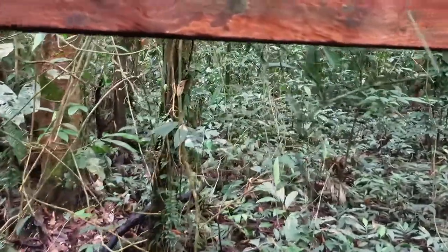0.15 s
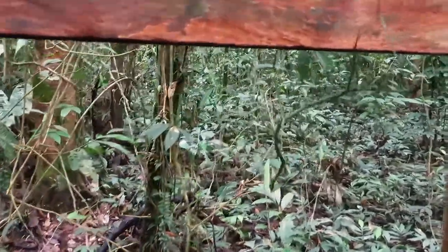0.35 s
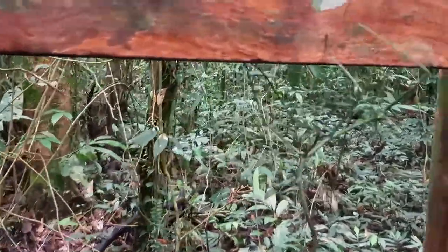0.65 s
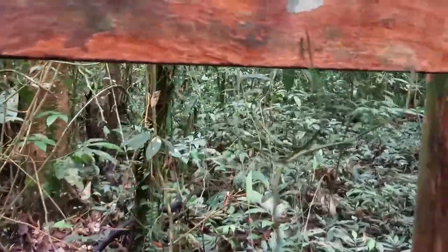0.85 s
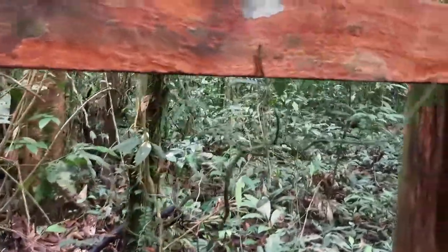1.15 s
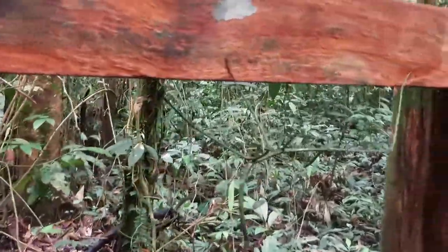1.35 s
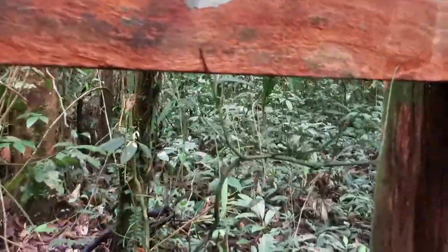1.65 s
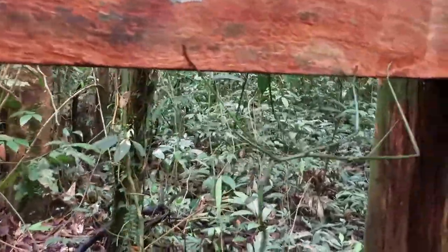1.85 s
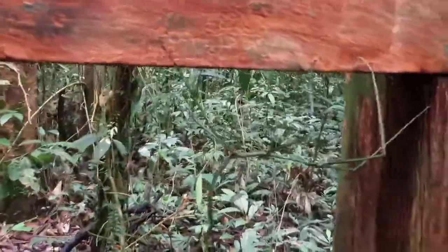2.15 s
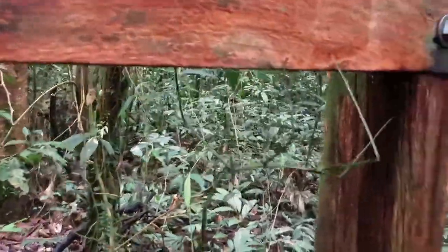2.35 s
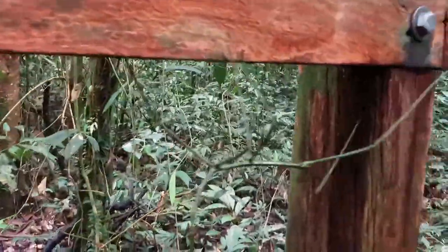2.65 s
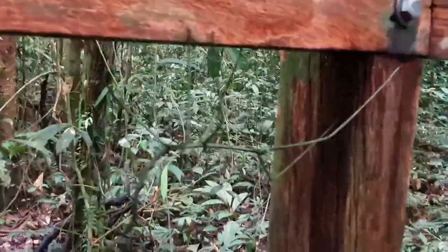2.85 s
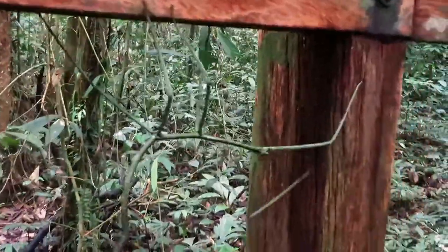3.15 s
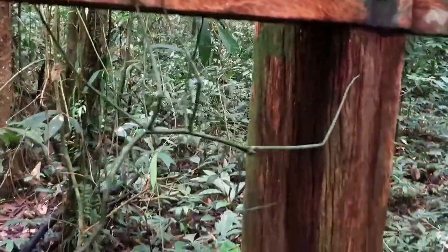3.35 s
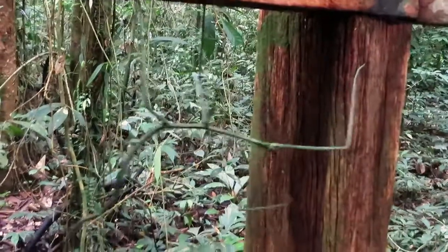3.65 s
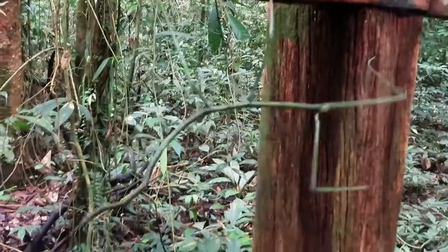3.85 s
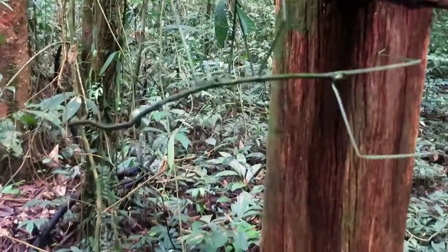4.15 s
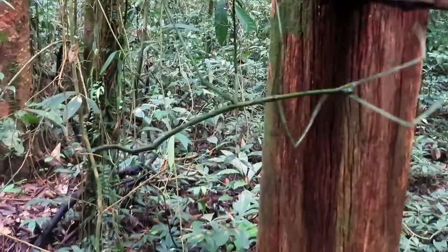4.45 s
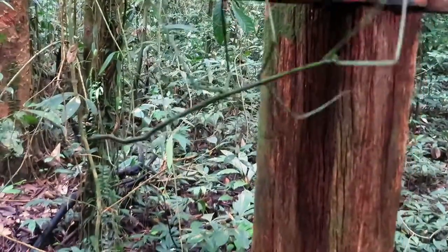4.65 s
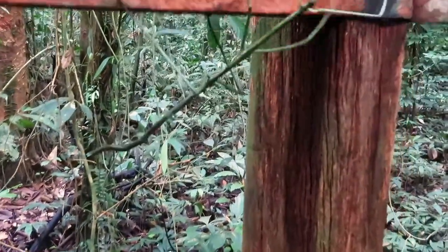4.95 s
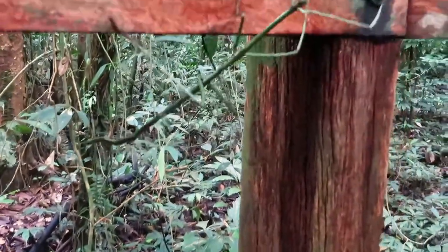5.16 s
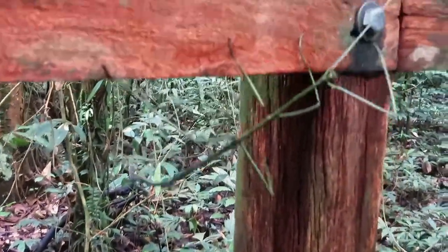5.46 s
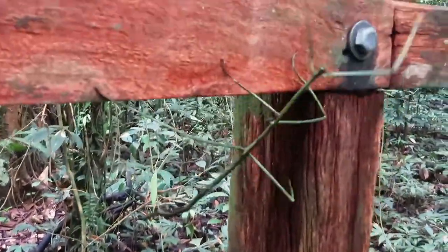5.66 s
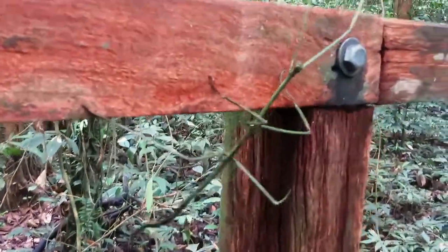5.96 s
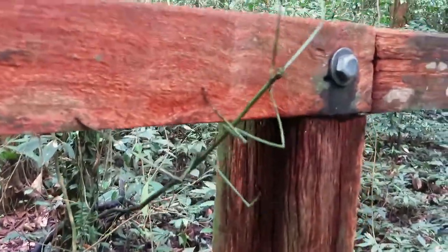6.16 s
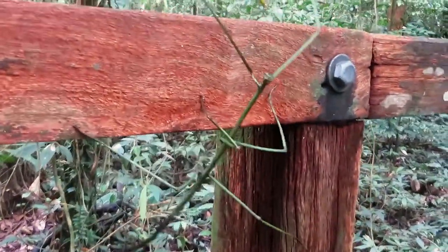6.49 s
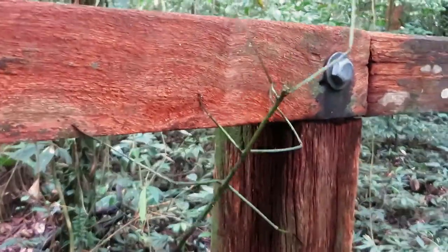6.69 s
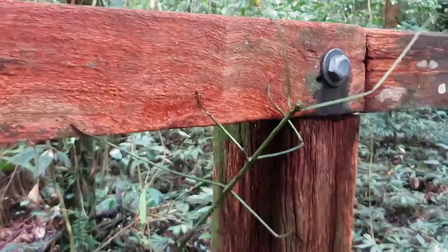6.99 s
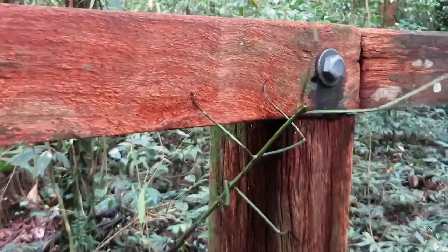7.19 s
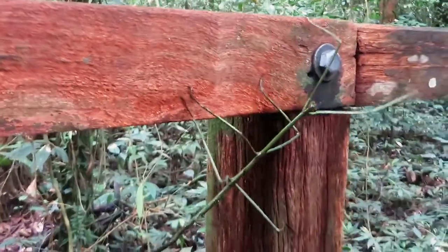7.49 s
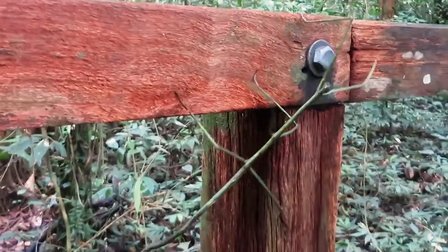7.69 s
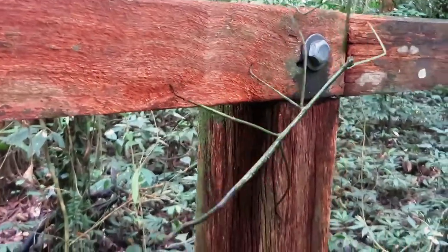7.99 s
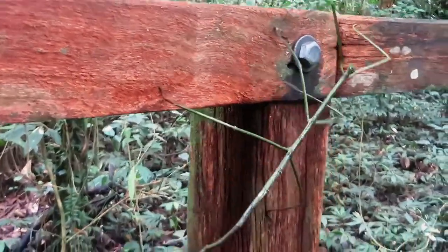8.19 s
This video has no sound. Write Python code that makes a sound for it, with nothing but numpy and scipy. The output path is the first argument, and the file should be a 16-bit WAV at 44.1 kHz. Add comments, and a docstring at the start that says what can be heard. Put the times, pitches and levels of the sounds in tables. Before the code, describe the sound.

A thick insect drone at a whistling mid-high pitch fills a rainforest from start to finish, swelling into a nasal whine. Above it a nearby cricket trills about once a second, with distant ones answering, over cicada hiss and a very high buzz. Faint low hoots come from afar; late on, a bird gives one quick falling call and two dry snaps click near a handheld microphone.

```python
"""A dense insect chorus drones near 2 kHz in a rainforest, with whining singers standing out of it.
A cricket trills about once a second, its far neighbours answer, and katydids hiss and buzz above.
Rising whoops, a bird's falling call and low hoots echo among the trunks; handling ticks, snaps and bumps.
Crowds are filtered noise and single callers are sines with moving pitch and level;
trunk echoes are convolution with decaying noise, and contacts are brief bursts of coloured noise."""
import sys
import numpy as np
from scipy import signal
from scipy.fft import rfft, irfft, next_fast_len
from scipy.io import wavfile
from scipy.ndimage import map_coordinates

SR = 44100
rng = np.random.default_rng(int(sys.argv[2]) if len(sys.argv) > 2 else 0)


def int16_out(signal):
    """Quantize to a 16-bit WAV file."""
    q = np.round(np.clip(np.atleast_2d(signal).T, -1, 1) * 32767)
    wavfile.write(sys.argv[1], SR, q.astype(np.int16))


N = 367353
T = np.arange(N) / SR  # time of each sample, s

# All levels below are relative, in dB; the functions add their own trims.
# Spectra. Each row: frequency in Hz, spectral level in dB per Hz.
AIR_SPECTRUM = [(20, -22), (60, 1), (130, 1.5), (300, -2.5), (650, -6), (860, -4), (1200, -6.5),
                (3000, -27.5), (7000, -31), (9000, -55.5), (13000, -32)]
CHORUS_SPECTRUM = [(900, -48), (1300, -26), (1480, -6.5), (1650, 0.5), (1850, 1), (2000, 0), (2200, -1),
                   (2320, -3), (2520, -19.5), (2800, -62.5)]
CICADA_SPECTRUM = [(2000, -15), (2500, 3), (2680, 0.5), (2800, 0), (3000, 5), (3600, 3), (4200, -1),
                   (4600, -4), (5600, -5.5), (6800, -12.5), (8000, -50)]
CRICKET_SPECTRUM = [(5300, -37), (5750, -16.5), (6000, 2), (6200, 7), (6450, 9.5), (6620, 3.5),
                    (6750, -50.5), (7100, -63)]
KATYDID_SPECTRUM = [(7000, -21.5), (7500, -20.5), (7750, -13), (7900, -9.5), (8230, -3), (8450, -7.5),
                    (8700, -12.5), (8900, -23), (9300, -72.5)]
TICK_SPECTRUM = [(300, -10), (2000, -1), (5000, -5), (8000, -5.5), (12000, -13.5)]
SNAP_SPECTRUM = [(300, -21), (1500, -14), (2900, -1.5), (3500, -11), (4200, -7.5), (5400, 4), (6000, -13),
                 (8000, -19), (12000, -32)]
BUMP_SPECTRUM = [(30, -22), (150, -4), (270, 1.5), (500, -11), (1000, -1.5), (2500, -20.5), (6000, -28),
                 (10000, -52.5)]
# Width of the air. Each row: frequency in Hz, side-to-mid ratio in dB.
AIR_SIDE = [(25, -6.5), (60, -12), (125, 4), (250, 8.5), (500, 9), (1000, 1), (3000, -8.5), (9000, 0)]
# Reverberation of the trees. Each row: frequency in Hz, time to fall by 60 dB in s.
FOREST_T60 = [(300, 0.54), (2000, 0.73), (4000, 0.92), (10000, 0.28)]

# Contacts: faint handling ticks, dry snaps close by, soft handling bumps.
# Each row: start in seconds, level at the onset in dB.
TICKS = [(2.9944, -17.5), (3.889, -22), (6.725, -24), (6.8204, -14.5), (7.231, -20)]
SNAPS = [(6.6646, -15.5), (6.6918, -18.5)]
BUMPS = [(1.43, -34.5), (2.289, -39), (2.892, -34), (3.052, -36.5), (5.099, -36.5), (6.049, -32),
         (6.654, -37), (7.228, -31.5), (7.569, -39)]

# The bird's faint opening note and its loud falling slur.
# Each row: time in seconds, pitch in Hz, level in dB.
BIRD = [(5.74, 3900, -62), (5.82, 3950, -46), (5.95, 3950, -46), (6.01, 3900, -52), (6.06, 4150, -37),
        (6.115, 4180, -35), (6.135, 3700, -33), (6.18, 3280, -31), (6.24, 3050, -48)]
# Bouts of far low hooting. Each row: start in seconds, end in seconds, level of the first hoot in dB.
HOOT_BOUTS = [(.5, .9, -50), (1.95, 2.5, -51), (2.9, 3.4, -52), (4.25, 5.0, -53), (5.3, 5.9, -53.5),
              (6.25, 6.45, -55.5)]
HOOT_HZ, HOOT_SCATTER_HZ = 842, 14  # mean pitch and its standard deviation
HOOT_S, HOOT_GAP_S = .06, .095  # length, and spacing from start to start
HOOT_FADE_DB_PER_S = 7.5

# The highest insects, each drifting slowly up and down.
# Each row: mean pitch in Hz, level in dB, drift period in s, time of a highest pitch in s.
HIGH_SINGERS = [(11637, -3, 4.05, .62), (11509, -5, 4.75, 1.15), (11918, -6, 3.2, .65)]
# Level of the highest insects. Each row: time in seconds, level in dB.
HIGH_LEVEL = [(0.03, -52.5), (0.33, -47.5), (0.56, -53.5), (0.88, -47.5), (1.09, -52.5), (1.27, -46),
              (1.73, -51), (1.96, -45.5), (2.03, -53), (2.36, -44.5), (2.58, -52.5), (2.77, -45.5),
              (2.88, -50.5), (3.67, -50), (4.15, -55), (4.27, -47.5), (4.7, -49.5), (4.87, -45),
              (5.14, -51.5), (6.96, -47.5), (7.08, -54), (7.38, -46), (7.59, -52), (7.65, -48),
              (8.05, -54.5), (8.3, -50)]
HIGH_DRIFT_HZ = 23
HIGH_STROKES_PER_S, HIGH_STROKE_DEPTH = 290, .4

# Thin steady singers. Each row: pitch in Hz, half-width in Hz, level in dB.
STEADY_SINGERS = [(2989, 18, -56), (2711, 17, -54), (4066, 16, -62), (5183, 22, -52.5), (7320, 40, -63.5)]
# Waves of far crickets answering. Each row: start in seconds, end in seconds, level in dB.
ANSWERS = [(-.1, 0.348, -40.5), (.5, 1.103, -42.5), (1.355, 2.004, -41.5), (2.45, 2.954, -41),
           (3.448, 4.3, -42), (4.54, 5.15, -41), (5.2, 5.7, -45), (6.15, 6.747, -44), (7.216, 7.718, -40),
           (8.182, 8.6, -43)]
ANSWER_RISE_S, ANSWER_FALL_S, CRICKET_BED_DB = .16, .23, -44
CICADA_DB, KATYDID_DB, KATYDID_FADE_DB_PER_S = -43, -43, .09

# The near cricket's trills. Each row: start in seconds, length in s, level in dB, pulse depth from 0 to 1.
TRILLS = [(0.177, 0.52, -36.5, .55), (1.355, 0.52, -32.5, 1), (2.443, 0.52, -34, 0.88),
          (3.906, 0.49, -33.5, 1), (4.971, 0.56, -35, 1), (6.278, .55, -36, 0.3), (7.27, 0.53, -34.5, 0.3),
          (8.24, .5, -35.5, 0.5)]
STROKES_PER_S = 29.55
TRILL_HZ, COLD_FLAT_HZ, WARM_UP_S = 6542, 70.6, .1478  # a trill starts flat and climbs to its pitch

# Levels of the massed chorus and of its whining singers. Each row: time in seconds, level in dB.
MASS_LEVEL = [(0.03, -34), (0.69, -37.5), (2.08, -39), (2.1, -32), (2.17, -42), (2.22, -36.5), (2.29, -40),
              (3.28, -37), (3.62, -39), (4.2, -38), (7.84, -38), (8.3, -37.5)]
WHINE_LEVEL = [(0.03, -34), (0.24, -45), (1.27, -30.5), (1.96, -48), (2.24, -36), (2.45, -37), (2.52, -33),
               (2.72, -32.5), (3.62, -31), (4.2, -31), (4.96, -34.5), (4.98, -33.5), (5.53, -33.5),
               (5.6, -36.5), (6.04, -36.5), (6.16, -32.5), (7.93, -34.5), (8.3, -53)]
# Near rising whoops. Each row: start in seconds, level in dB.
WHOOPS = [(.735, -40), (.83, -34), (.92, -37), (1.26, -39), (1.36, -38), (2.082, -36), (2.185, -32.5),
          (2.71, -39), (2.8, -39), (2.98, -37), (3.07, -37), (3.2, -37), (3.29, -37), (4.56, -38),
          (7.8, -38)]
# Near whistles held over the chorus. Each row: start in seconds, end in seconds, pitch in Hz, level in dB.
WHISTLES = [(.3, .85, 1824, -44.5), (1.28, 1.43, 2205, -38.5), (2.495, 2.55, 2180, -26),
            (3.44, 3.9, 2165, -32), (4.31, 4.45, 2115, -33.5), (4.78, 4.97, 2156, -29.5),
            (5.48, 5.66, 2440, -42), (5.575, 5.66, 2170, -28), (6.1, 6.26, 2168, -32),
            (6.27, 6.45, 2410, -42), (6.57, 6.72, 2440, -44), (6.675, 6.715, 2190, -26),
            (7.81, 7.86, 2105, -32)]
WHINE_HZ = 2161
UPPER_DB = -15.5  # the upper singers relative to the whine level
TOP_HZ = 13200  # band limit of the output


def amp(db):
    """Logarithmic level: decibels to amplitude gain."""
    return 10 ** (np.asarray(db) / 20)


def unit(x):
    """Normalisation: scale to rms 1."""
    return x / np.sqrt(np.mean(x ** 2) + 1e-20)


def along(points, hz):
    """Interpolation of (frequency, value) points on a logarithmic frequency axis."""
    f, v = np.transpose(points)
    return np.interp(np.log(hz + 1), np.log(f + 1), v)


def curves(rows):
    """Linear envelopes: one value per sample for each column after the time."""
    s, *cols = np.transpose(rows)
    return [np.interp(T, s, c) for c in cols]


def wobble(rate):
    """Slow random modulation: a smooth curve through rate random knots a second."""
    knots = rng.standard_normal(int(N * rate / SR) + 4)
    return map_coordinates(knots, [T * rate])


def filtered(x, response):
    """Linear filtering: the spectrum of x times a response of frequency."""
    m = next_fast_len(N + SR // 2)
    hz = np.fft.rfftfreq(m, 1 / SR)
    return irfft(rfft(x, m) * response(hz), m)[..., :N]


def noise(spectrum):
    """Coloured noise: two unrelated noises of one spectrum, scaled together to rms 1."""
    white = rng.standard_normal((2, N))
    return unit(filtered(white, lambda hz: amp(along(spectrum, hz))))


def whine(centre_hz, width_hz):
    """Multipath blurring: a tone's many paths through the trees make a narrow band; two unrelated versions."""
    white = rng.standard_normal((2, N))
    return unit(filtered(white, lambda hz: 1 / (1 + ((hz - centre_hz) / width_hz) ** 2)))


def tone(hz):
    """Frequency modulation: a sine of rms 1 whose phase accumulates a pitch curve."""
    return np.sqrt(2) * np.sin(2 * np.pi * np.cumsum(hz) / SR)


def spread(pair, side_db):
    """Stereo width: left and right are the sum and difference of a mid and a side signal."""
    mid, side = pair[0], pair[1] * amp(side_db)
    return np.array([mid + side, mid - side])


def ports(x, lead):
    """Interaural phase: a tone reaches two microphone ports lead radians apart."""
    analytic = signal.hilbert(x, next_fast_len(N))[:N]
    return np.real(analytic * np.exp(.5j * lead * np.array([[1], [-1]])))


def scatter(x, side_db):
    """Diffuse reverberation: trunks and leaves answer with noise that decays at a rate set by frequency."""
    hz, t, z = signal.stft(rng.standard_normal((2, SR)), SR, nperseg=256)
    decay = amp(-60 * t / along(FOREST_T60, hz)[:, None])
    tail = signal.istft(z * decay, SR, nperseg=256)[1]
    tail = tail / np.linalg.norm(tail[0])
    wet = signal.fftconvolve(x[None], tail, axes=1)[:, :N]
    return spread(wet, side_db)


def forest(x, wet_db, side_db):
    """Direct and scattered sound, weighted by the sum of powers to hold the level roughly constant."""
    wet = amp(wet_db)
    return (x + wet * scatter(x, side_db)) / np.hypot(1, wet)


def knocks(rows, spectrum, t60):
    """Damped impact: brief contacts as coloured bursts that fall by 60 dB in t60 seconds."""
    blows = np.zeros(N)
    for start, db in rows:
        rise = np.clip((T - start) / .00079, 0, 1)
        blows += amp(db - 60 * np.maximum(T - start, 0) / t60) * rise
    return blows * noise(spectrum)


def notes(rows, waver_hz):
    """Pitch relaxation: held tones start flat, settle exponentially onto their pitch and waver."""
    out, waver = np.zeros(N), waver_hz * wobble(30)
    for start, end, hz, db in rows:
        on = (T > start) & (T < end)
        age = T[on] - start
        gate = np.clip(age / .0043, 0, 1) * np.clip((end - T[on]) / .021, 0, 1)
        scoop = 1 - .01184 * np.exp(-age / .038)
        out[on] += amp(db) * gate * tone(hz * scoop + waver[on])
    return out


def whoops(rows):
    """Exponential glide: whistles shoot up and level off; rows of (s, dB, top Hz, glide s)."""
    out, age = np.zeros(N + SR), np.arange(int(.12 * SR)) / SR
    swell = np.clip(age / .04, 0, 1) * np.clip((age[-1] - age) / .045, 0, 1)
    for start, db, top_hz, glide in rows:
        hz = top_hz * (1 - .6 * np.exp(-age / glide))
        first = max(round(start * SR), 0)
        out[first:first + len(age)] += amp(db) * swell * tone(hz)
    return out[:N]


def air():
    """Diffuse field: the soft rush of the forest, with a stereo width that depends on frequency."""
    mid, side = noise(AIR_SPECTRUM)
    side = filtered(side, lambda hz: amp(along(AIR_SIDE, hz)))
    return amp(-51.5 + 1.1 * wobble(2.97)) * np.array([mid + side, mid - side])


def handling():
    """Impulsive excitation: snaps, ticks and bumps close by, without forest scatter."""
    snaps = amp(-2.5) * spread(knocks(SNAPS, SNAP_SPECTRUM, t60=.03), side_db=1)
    ticks = amp(-9) * spread(knocks(TICKS, TICK_SPECTRUM, t60=.02), side_db=-3)
    bumps = amp(-2) * spread(knocks(BUMPS, BUMP_SPECTRUM, t60=.089), side_db=-8)
    return snaps + ticks + bumps


def hoots():
    """Repeated tone bursts: runs of short low notes, each run fading, smeared by the trunks."""
    rows = []
    for start, end, db in HOOT_BOUTS:
        for s in np.arange(start, end, HOOT_GAP_S):
            late, sharp, extra = rng.standard_normal(3) * [.015, HOOT_SCATTER_HZ, 2.2]  # s, Hz, dB
            level = db - HOOT_FADE_DB_PER_S * (s - start) + extra
            rows.append((s + late, s + late + HOOT_S, HOOT_HZ + sharp, level))
    far = notes(rows, waver_hz=32) * amp(-2 + 4.1 * wobble(60))
    return forest(far, wet_db=-2, side_db=-6)


def bird():
    """Random frequency modulation: slurs that rasp more as they fall, smeared by the trunks."""
    bird_hz, bird_db = curves(BIRD)
    rasp_hz = 120 + .08 * (bird_hz.max() - bird_hz)
    slur = tone(bird_hz + rasp_hz * wobble(700))
    calling = (T > BIRD[0][0]) * (T < BIRD[-1][0])
    call = amp(bird_db - 1 + 4.4 * wobble(400)) * calling * slur
    return forest(call, wet_db=-1, side_db=-11)


def high_katydid():
    """Amplitude modulation: fast wing strokes pulse three very high tones that drift in pitch."""
    level_db, = curves(HIGH_LEVEL)
    buzz = np.zeros(N)
    for hz, db, period, crest in HIGH_SINGERS:
        drift = HIGH_DRIFT_HZ * np.cos(2 * np.pi * (T - crest) / period)
        cycle = 2 * np.pi * (HIGH_STROKES_PER_S * T + rng.random())
        strokes = 1 + HIGH_STROKE_DEPTH * np.cos(cycle)
        flicker = amp(db + 1.9 * wobble(7) + .9 * wobble(500))
        buzz += flicker * strokes * tone(hz + drift + 15 * wobble(500))
    return amp(level_db + 4.5) * (ports(buzz, lead=1.9) + amp(-6.5) * scatter(buzz, side_db=3))


def far_insects():
    """Incoherent summation: many far insects add in power to hiss, cricket waves and thin steady tones."""
    power = amp(CRICKET_BED_DB) ** 2
    for start, end, db in ANSWERS:
        rise = np.clip((T - start) / ANSWER_RISE_S, 0, 1)
        fall = np.clip(1 - (T - end) / ANSWER_FALL_S, 0, 1) ** 2
        power = power + amp(db) ** 2 * rise * fall
    crickets = np.sqrt(power) * amp(.86 * wobble(55)) * spread(noise(CRICKET_SPECTRUM), side_db=-5)
    cicada_level = amp(CICADA_DB + .4 * wobble(4.4) + .53 * wobble(25))
    cicadas = cicada_level * spread(noise(CICADA_SPECTRUM), side_db=-11.5)
    katydid_level = amp(KATYDID_DB - KATYDID_FADE_DB_PER_S * T + .57 * wobble(60))
    katydids = katydid_level * spread(noise(KATYDID_SPECTRUM), side_db=-1.5)
    katydids = katydids * amp([[.9], [-.9]])  # towards the left
    singers = sum(amp(db) * whine(hz, width) for hz, width, db in STEADY_SINGERS)
    return cicadas + crickets + katydids + spread(singers, side_db=-9)


def cricket():
    """Stridulation: each wing stroke is one pulse of tone; the pitch climbs as the trill gets going."""
    song, scrape_hz = np.zeros(N), 42 * wobble(250)
    for start, length, db, depth in TRILLS:
        age = np.maximum(T - start, 0)
        gate = np.clip(age / .015, 0, 1) * np.clip((length - age) / .02, 0, 1)
        cycle = 2 * np.pi * STROKES_PER_S * age
        stroke = 1 - depth * np.cos(cycle)
        cold = np.exp(-age / WARM_UP_S)
        hz = TRILL_HZ - COLD_FLAT_HZ * cold + 30 * np.sin(cycle) + scrape_hz
        song += amp(db - 2.9 * cold) * gate * stroke * tone(hz)
    song = song * amp(-3 + .67 * wobble(30))
    return ports(song, lead=.82) + amp(-12) * scatter(song, side_db=-18)


def chorus():
    """Superposition: far whoops merge into a drone, which whines where they level off; near singers stand out."""
    (mass_db,), (whine_db,) = curves(MASS_LEVEL), curves(WHINE_LEVEL)
    mass = amp(mass_db - 2 + .8 * wobble(35)) * spread(noise(CHORUS_SPECTRUM), side_db=-17.5)
    # 260 far whoops with random start (s), level (dB), top pitch (Hz) and glide time (s)
    swarm = whoops(rng.uniform([0, -6, 1850, .02], [T[-1], 0, 2200, .035], size=(260, 4)))
    swarm = amp(mass_db - 6) * forest(unit(swarm), wet_db=-3, side_db=-7.5)
    crowd = amp(whine_db - 4.5 + .79 * wobble(16)) * spread(whine(2108, width_hz=71), side_db=-12.5)
    upper = amp(whine_db + UPPER_DB + 2.5 * wobble(14)) * spread(whine(2424, width_hz=37), side_db=-11)
    voice_hz = WHINE_HZ + 5 * wobble(5) + 8 * wobble(30)
    voice = amp(whine_db - 6 + 2.05 * wobble(25)) * tone(voice_hz)
    held = forest(voice + notes(WHISTLES, waver_hz=4.4), wet_db=-5, side_db=-17)
    rising = amp(-1 + 3.5 * wobble(140)) * whoops([(s, db, 2190, .024) for s, db in WHOOPS])
    rising = forest(rising, wet_db=-4.5, side_db=-15)
    return mass + swarm + crowd + upper + held + rising


def scene():
    """Superposition of sources: the forest, most of it a little to the right, and the handling close by."""
    callers = (bird() + hoots() + chorus()) * amp([[-.9], [.9]])
    insects = (far_insects() + cricket()) * amp([[-.7], [.7]])
    return air() + handling() + high_katydid() + insects + callers


def record(dry):
    """Band limitation: nothing is kept from TOP_HZ upwards."""
    return filtered(dry, lambda hz: hz < TOP_HZ)


dry = scene()
out = record(dry)
int16_out(out)
```